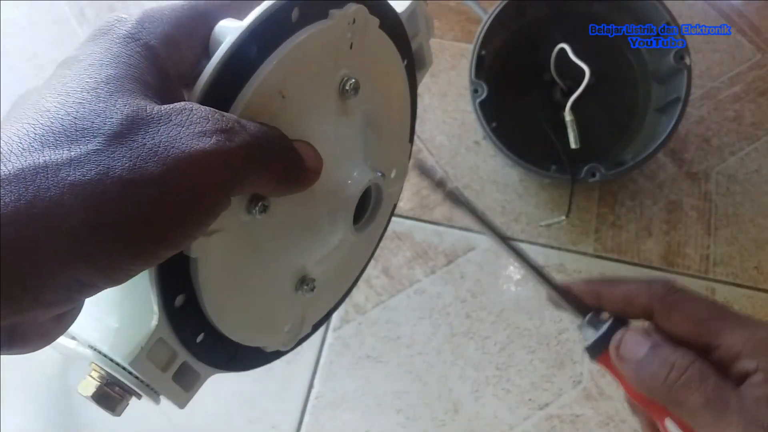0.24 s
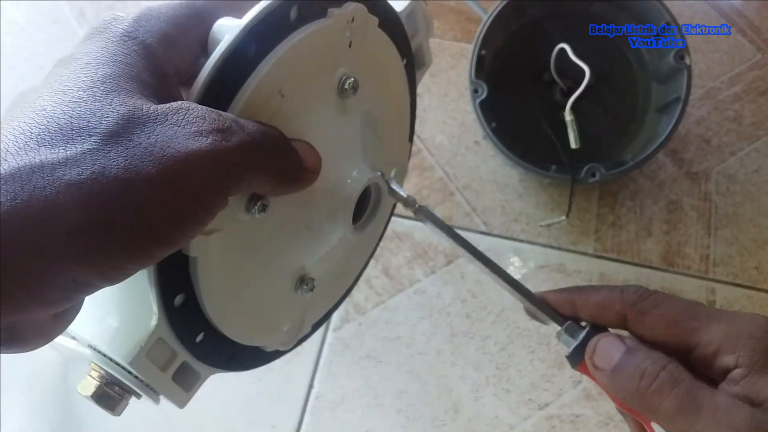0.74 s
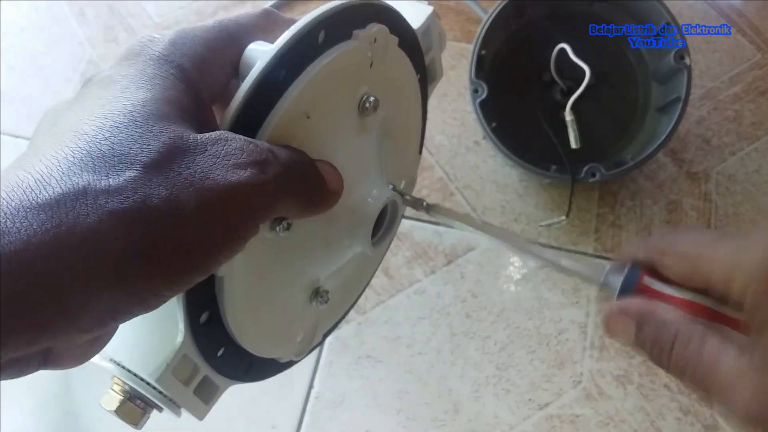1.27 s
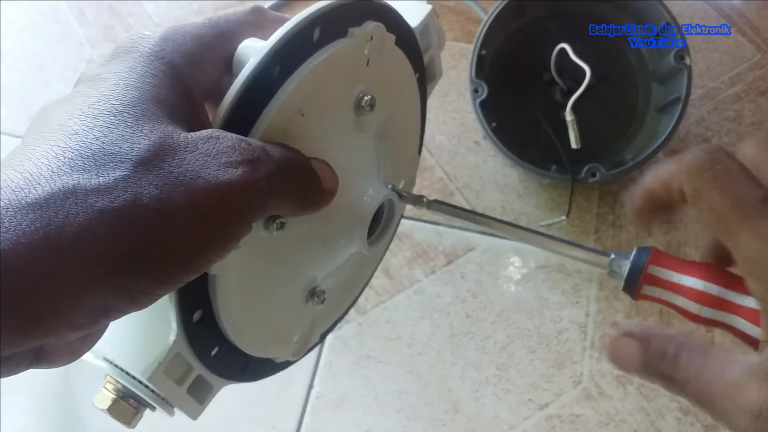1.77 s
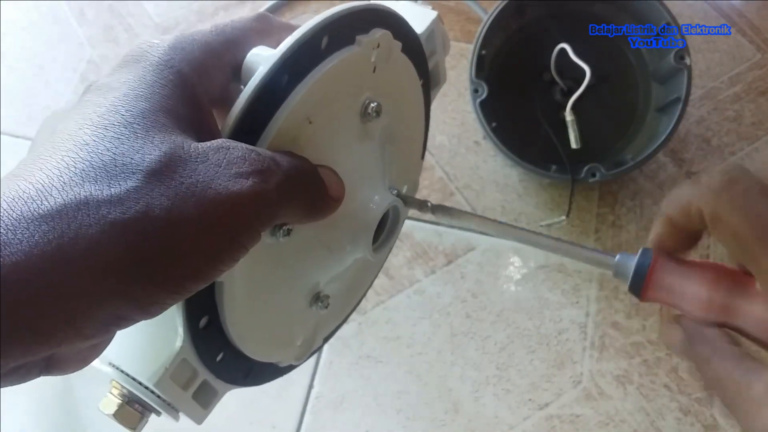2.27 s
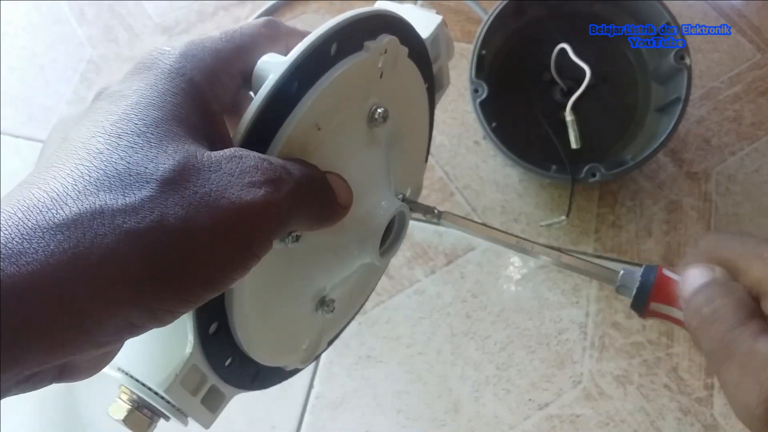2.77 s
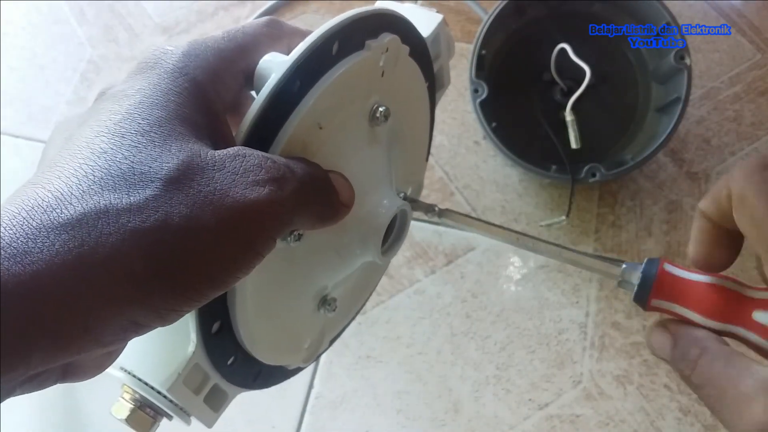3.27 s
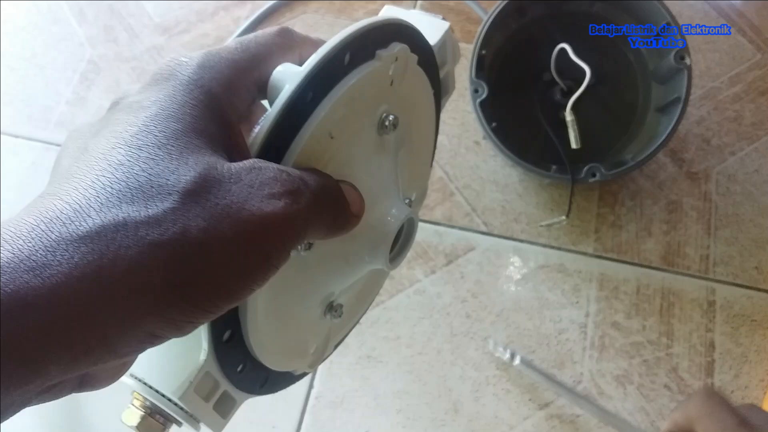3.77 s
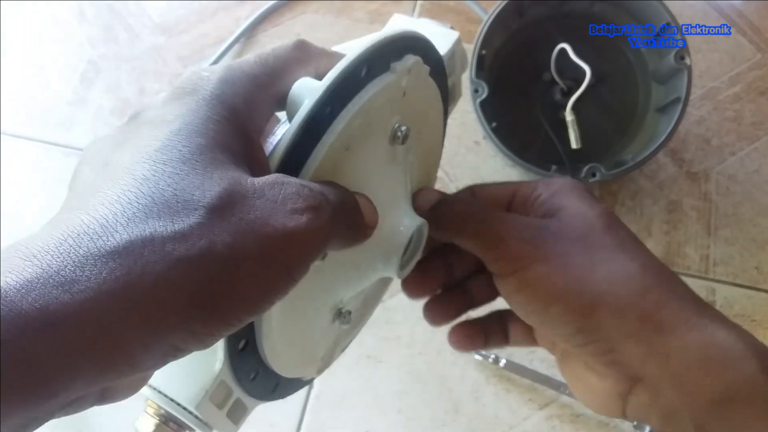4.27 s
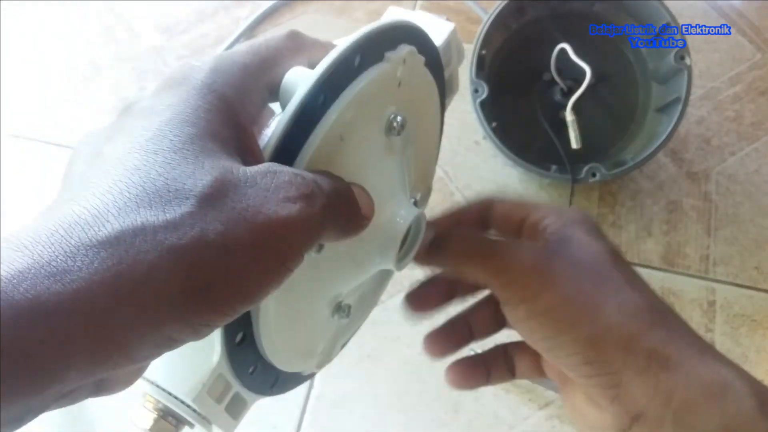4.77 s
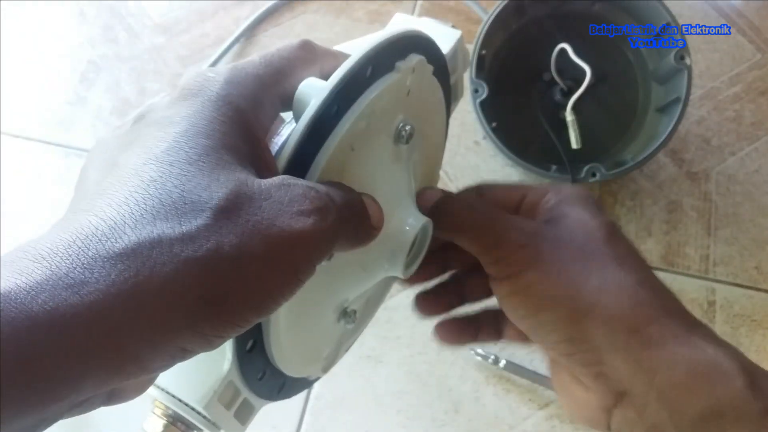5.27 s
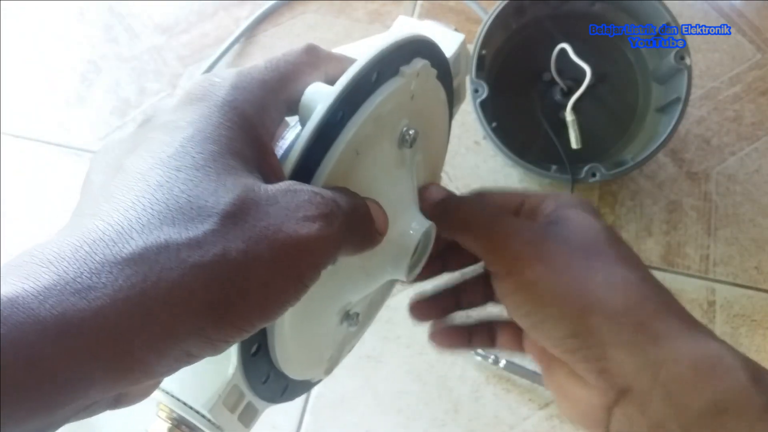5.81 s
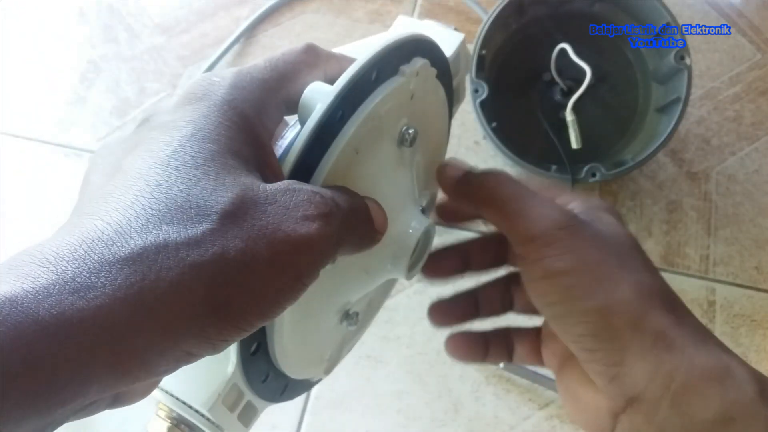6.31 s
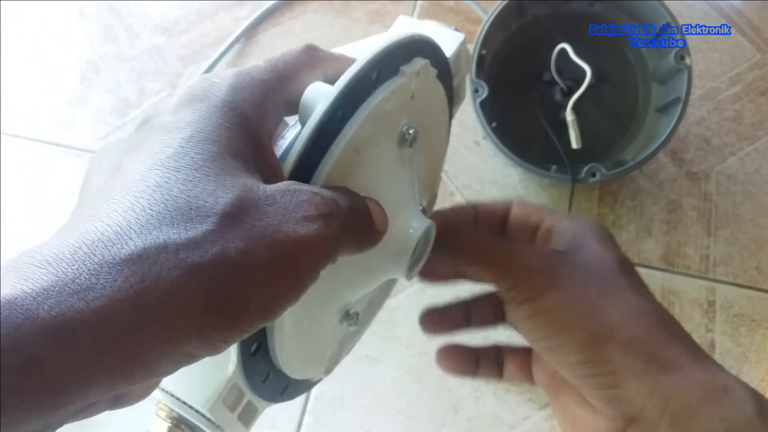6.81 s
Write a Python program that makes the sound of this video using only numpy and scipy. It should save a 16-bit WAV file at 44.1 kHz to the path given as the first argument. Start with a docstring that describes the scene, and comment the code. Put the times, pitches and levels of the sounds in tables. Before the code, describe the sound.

Low rumbling hum and faint electronic hiss underlie close, dry handling. First a cluster of crisp metal and plastic clicks with a soft deep bump, then barely audible even slips from unscrewing. A tool knocks and rocks to rest on floor tiles, followed by irregular small ticks of a loose screw in its hole. Short indoor tail, nearly mono.

```python
"""A screwdriver taps and slips about a screw in a plastic housing, is laid on the tiles, and fingers tick
the loose screw in its hole; a hum, hiss and thin whine lie underneath.
Each contact is a noisy click, damped sines of metal and plastic, and a bright snap if hard.
Slips are runs of tiny clicks, and a soft deep bump is a swelling sine; all handling but the bump
gets a short room tail. The background is coloured noise and steady sines."""
import sys
import numpy as np
from scipy import signal
from scipy.fft import rfft, irfft, next_fast_len
from scipy.io import wavfile

SR = 44100
rng = np.random.default_rng(int(sys.argv[2]) if len(sys.argv) > 2 else 0)


def dump(signal):
    """Clip the signal to [-1, 1] and save it as 16-bit WAV at the path in sys.argv[1]."""
    limited = np.clip(np.atleast_2d(signal).T, -1, 1)
    pcm = np.round(limited * 32767).astype(np.int16)
    wavfile.write(sys.argv[1], SR, pcm)


N = 310905
TIME = np.arange(N) / SR
AGE = TIME[:SR // 2]   # seconds since a contact

# A full grip chokes the metal's ring and drives the blow into the plastic.
GRIP_DAMPS_DB, GRIP_KNOCKS_DB = 23, 20.5

# Resonances of the plastic housing, knocked by tip and tool.
# Each row: frequency in Hz, relative level in dB, T60 decay in seconds.
HOUSING_MODES = [(230, -11.5, 0.067), (332, -5.5, 0.066), (420, 0, 0.042), (510, 2.5, 0.034),
                 (615, -0.5, 0.026), (816, -1.5, 0.017)]


def screwdriver_taps():
    """Tool tip and fingers knock on screw and housing, ringing the metal shaft and the plastic."""
    # Each row: start in seconds, strength in dB, grip from 0 to 1, contact hardness in Hz, favoured mode in Hz.
    taps = [(.554, -31, 0.21, 5600, 1525), (.7795, -31.5, 0.28, 7000, 2030),
            (.7905, -20.5, 0.13, 11100, 1940), (.834, -26.5, 0.45, 2920, 550), (.911, -31, 0.3, 2640, 2010),
            (1.0263, -29, .88, 2880, 2300), (4.1907, -21.5, .35, 2800, 2030)]
    # Resonances of the shaft. Each row: frequency in Hz, relative level in dB, T60 decay in seconds.
    shaft_modes = [(950, -10, .13), (1316, -12.5, 0.23), (1510, -10.5, 0.14), (1816, 5.5, 0.02),
                   (2025, -5.5, 0.094), (2692, -7, 0.21), (2880, -17, 0.19), (3324, -11.5, 0.17),
                   (4010, 4.5, 0.049), (4160, -9, .08)]
    # Colour of its dense, quickly damped click. Each row: frequency in Hz, relative density in dB per Hz.
    shaft_click = [(400, 3.5), (750, -23), (1150, 11), (1450, 2), (1880, 8.5), (2450, -2.5), (3200, 0),
                   (4000, 0), (4800, -3), (6000, -7), (8500, -12), (11000, -46)]
    hits = blows(taps, knock_db=-17.5, ring_db=-11, snap_hz=14900)
    return contacts(hits, shaft_modes, HOUSING_MODES, shaft_click, click_t60=0.019, snap_t60=0.01,
                    spread_db=1.5, rebound_s=.003, rebound_db=-9.0, rise_s=0.00095)


def screwdriver_drops():
    """The screwdriver drops on the tiles and rocks to rest, each contact weaker than the last."""
    # Each row: start in seconds, strength in dB, grip from 0 to 1, contact hardness in Hz, favoured mode in Hz.
    drops = [(3.8057, -20, 0.05, 9200, 2310), (3.8666, -25, 0.31, 6940, 3830),
             (3.8932, -28.5, 0.48, 7000, 3620), (3.9297, -32.5, 0.65, 5600, 3900),
             (3.9654, -35.5, .8, 1100, 1210), (3.9864, -42.5, 0.96, 1200, 1200),
             (4.0294, -49, 1, 1100, 1200)]
    # Resonances of the handle. Each row: frequency in Hz, relative level in dB, T60 decay in seconds.
    handle_modes = [(1196, 5, 0.018), (1428, -4, 0.027), (2450, 3.5, 0.022), (2520, -21, 0.16),
                    (3360, 2.5, 0.014), (6200, -4, 0.016)]
    # Colour of its dense, quickly damped click. Each row: frequency in Hz, relative density in dB per Hz.
    handle_click = [(400, -15), (750, -10), (1200, 3.5), (1800, -8), (2600, 1.5), (3600, -5.5), (4600, -2),
                    (6200, -4.5), (7500, -20), (11000, -24)]
    hits = blows(drops, knock_db=-25, ring_db=-6, snap_hz=11100)
    return contacts(hits, handle_modes, HOUSING_MODES, handle_click, click_t60=0.012, snap_t60=0.014,
                    spread_db=0.6, rebound_s=.0015, rebound_db=-6.0, rise_s=0.00078)


def screw_ticks():
    """The loose screw ticks in its hole: its metal rings and the plastic cover knocks."""
    # Resonances of the screw. Each row: frequency in Hz, relative level in dB, T60 decay in seconds.
    screw_modes = [(1100, -32, 0.064), (2014, -8, 0.14), (2072, -12, 0.11), (2303, -5.5, .1),
                   (2670, -17.5, 0.21), (3347, -17, 0.16), (3620, -11, 0.068), (4210, -11, 0.077),
                   (4350, 2.5, 0.028), (4690, -10.5, .07), (5420, -15.5, 0.14), (5630, -12, 0.033)]
    # Resonances of the cover. Each row: frequency in Hz, relative level in dB, T60 decay in seconds.
    cover_modes = [(474, -7, 0.023), (918, -2, .035), (1066, -1.5, 0.083), (1194, -2, 0.038),
                   (1320, 2, 0.013)]
    # Colour of the dense, quickly damped click. Each row: frequency in Hz, relative density in dB per Hz.
    screw_click = [(600, -37), (1100, 4), (1650, -17), (2200, -3.5), (2900, -5.5), (3550, 4), (4000, -1),
                   (4480, 10.5), (5000, 1), (5600, 3.5), (6600, -14), (10000, -26)]
    hits = blows(screw_touches(), knock_db=-26.5, ring_db=-11.5, snap_hz=21000)
    return contacts(hits, screw_modes, cover_modes, screw_click, click_t60=0.014, snap_t60=0.023,
                    spread_db=1.5, rebound_s=.0018, rebound_db=-5.0, rise_s=0.00091)


def screw_touches():
    """Flicks, a weaker fall back after each (weaker still in a firm grip), and random faint grazes."""
    # Fingers flick the loose screw against its hole.
    # Each row: start in seconds, strength in dB, grip from 0 to 1, contact hardness in Hz, favoured mode in Hz.
    flicks = [(.0797, -47.5, .4, 7500, 3670), (3.543, -36.5, 0.14, 2750, 2050),
              (4.1662, -29, .02, 7050, 1990), (4.31, -36.5, 0.06, 7500, 2010),
              (4.3323, -30, 0.38, 4900, 2310), (4.4115, -20.5, 0.1, 8000, 5710),
              (4.6305, -30, 0.07, 7500, 5570), (4.6894, -31, 0.46, 11000, 4660),
              (4.9507, -26, .05, 6600, 2320), (5.2697, -32, 0.2, 2960, 1940),
              (5.3709, -31, 0.68, 6000, 3600), (5.391, -30, 0.28, 2300, 2020),
              (5.445, -34, 0.91, 11000, 1350), (5.5548, -39, 0.18, 5500, 2020),
              (5.6104, -40.5, 0.08, 5500, 1960), (5.823, -37, 0.19, 3930, 2170),
              (6.2306, -29.5, 0.73, 7000, 4880), (6.423, -38, 0.03, 2200, 2020),
              (6.6739, -31.5, 0.26, 6000, 2020), (6.7049, -36, 0, 2700, 2300),
              (6.735, -31, 0.31, 9500, 2270), (6.8017, -43.5, .4, 7500, 4400),
              (6.97, -42.5, 0.86, 1500, 1080)]
    fall_delay_s, fall_loss_db = 0.053, 13
    falls = [(s + fall_delay_s, db - fall_loss_db - GRIP_DAMPS_DB * grip, grip, hard_hz, favoured_hz)
             for s, db, grip, hard_hz, favoured_hz in flicks]
    # one graze at a random moment in each time slot of the twiddling
    twiddle_start_s, twiddle_end_s, grazes_per_s = 5.85, 6.9, 5
    graze_db, graze_grip, graze_hardness_hz, graze_mode_hz = -41, 0.54, 3540, 2030
    slots = np.arange(twiddle_start_s, twiddle_end_s, 1 / grazes_per_s)
    times = np.minimum(slots + rng.random(len(slots)) / grazes_per_s, TIME[-1])
    grazes = [(s, graze_db, graze_grip, graze_hardness_hz, graze_mode_hz) for s in times]
    return [*flicks, *falls, *grazes]


def slips(catches_per_s, catch_t60):
    """Metal slips on metal and plastic in short runs of uneven catches, each a tiny click."""
    # Each row: start in seconds, strength in dB, fall time to 1/e in seconds, lowpass brightness in Hz.
    single_slips = [(1.242, -31.5, 0.033, 3500), (1.312, -33, 0.012, 2770), (1.435, -42, 0.0099, 1600),
                    (2.592, -37.5, 0.049, 1400), (2.942, -36.5, 0.05, 5500), (3.27, -39.5, 0.013, 3470),
                    (4.392, -37, 0.031, 5500), (4.658, -37.5, 0.037, 6000), (5.442, -32.5, 0.018, 5800),
                    (6.213, -37.5, 0.043, 6500)]
    # Colour of one catch. Each row: frequency in Hz, relative density in dB per Hz.
    slip_colour = [(300, -4), (540, 6.5), (750, -7), (1080, 5.5), (1650, -6), (2000, 4.5), (2350, -6.5),
                   (2900, -6.5), (4600, -8), (6000, -10.5), (8000, -4.5), (12000, -36)]
    out = np.zeros(N)
    for s, db, length_s, bright_hz in [*single_slips, *twists()]:
        happens = rng.random(len(AGE)) < catches_per_s / SR
        catches = happens * rng.standard_normal(len(AGE))
        catches[0] = 1
        catches = catches * np.exp(-(AGE / length_s) ** 2)
        run = signal.fftconvolve(catches / np.linalg.norm(catches), burst(slip_colour, catch_t60))
        add(out, s, from_db(db) * soften(run, bright_hz))
    return out


def twists():
    """The screw is undone in even twists of the wrist; the tip slips faintly in its head at each."""
    start_s, end_s, interval_s = 1.654, 3.0, .313
    db, length_s, bright_hz = -46.5, .022, 5050
    return [(s, db, length_s, bright_hz) for s in np.arange(start_s, end_s, interval_s)]


def hand_bump(s, hz, db, swell_s):
    """The held housing gives a soft, deep bump as the tool is pressed home: a sine that swells and dies."""
    out = np.zeros(N)
    envelope = AGE / swell_s * np.exp(1 - AGE / swell_s)
    add(out, s, from_db(db) * np.sin(2 * np.pi * hz * AGE) * envelope)
    return out


def blows(events, knock_db, ring_db, snap_hz):
    """Strength, grip and hardness decide how a blow divides into click, knock, ring and snap."""
    snap_db_per_octave = 23.5   # the snap grows with the hardness of the contact
    for s, db, grip, hard_hz, favoured_hz in events:
        grip = np.clip(grip, 0, 1)
        blow_knock_db = db + knock_db + GRIP_KNOCKS_DB * grip
        blow_ring_db = db + ring_db - GRIP_DAMPS_DB * grip
        blow_snap_db = db + snap_db_per_octave * np.log2(hard_hz / snap_hz)
        yield s, db, blow_knock_db, blow_ring_db, blow_snap_db, hard_hz, favoured_hz


def contacts(events, modes, body, colour, click_t60, snap_t60, spread_db, rebound_s, rebound_db, rise_s):
    """Contacts click, ring metal, knock plastic and snap more when hard; gives (impacts, rings)."""
    # Colour of the bright snap. Each row: frequency in Hz, relative density in dB per Hz.
    snap_colour = [(5000, -8), (9000, -14), (12500, -3.5), (14000, 4.5), (15500, 4.5), (17000, -28)]
    impacts, rings = np.zeros(N), np.zeros(N)
    onset = 1 - np.exp(-AGE / rise_s)
    for s, click_db, knock_db, ring_db, snap_db, hard_hz, favoured_hz in events:
        touches = chatter(rebound_s, rebound_db)
        click = signal.fftconvolve(burst(colour, click_t60), touches)[:len(AGE)]
        click = pick_out(from_db(click_db) * click, favoured_hz, boost_db=8.0, quality=11.5)
        knock = from_db(knock_db) * ring(body, spread_db)
        snap = from_db(snap_db) * 2 * burst(snap_colour, snap_t60)
        metal = from_db(ring_db) * ring(modes, spread_db, favoured_hz)
        add(impacts, s, onset * (soften(click, hard_hz) + knock + snap))
        add(rings, s, onset * soften(metal, hard_hz))
    return np.array([impacts, rings])


def chatter(rebound_s, rebound_db, count=3):
    """Parts touch, then rebound a few times within milliseconds, ever weaker."""
    touches = np.zeros(len(AGE))
    times = np.cumsum(rebound_s * rng.uniform(0.59, 1.5, count))
    touches[np.round(times * SR).astype(int)] = from_db(rebound_db * np.arange(1, count + 1))
    touches[0] = 1
    return touches / np.linalg.norm(touches)


def ring(modes, spread_db, favoured_hz=0):
    """Damped sines; where a blow lands decides how it shares its energy among them."""
    favour_db, favour_width_hz = 6.5, 260   # how strongly the point of contact lifts nearby modes
    out = 0
    for hz, db, t60 in modes:
        favour = favour_db * np.exp(-((hz - favoured_hz) / favour_width_hz) ** 2)
        strength = from_db(db + favour + spread_db * rng.standard_normal())
        polarity = rng.choice([-1, 1])
        out = out + polarity * strength * np.sin(2 * np.pi * hz * AGE) * fade(t60)
    return out


def burst(colour, t60):
    """Many close, heavily damped modes heard as one click, made from decaying coloured noise."""
    x = noise(colour, len(AGE)) * fade(t60)
    return x / np.sqrt(np.sum(x ** 2) / np.sum(fade(t60) ** 2)) / 2


def pick_out(x, hz, boost_db, quality):
    """The point of contact lifts the click around one resonance."""
    b, a = signal.iirpeak(hz, quality, fs=SR)
    return x + (from_db(boost_db) - 1) * signal.lfilter(b, a, x)


def soften(x, hz):
    """A softer contact holds less treble: a lowpass."""
    return signal.sosfilt(signal.butter(N=3, Wn=min(hz, SR / 2 - 1), fs=SR, output="sos"), x)


def fade(t60):
    """Exponential decay after a contact, down 60 dB at t60 seconds."""
    return np.exp(-np.log(1000) * AGE / t60)


def room(x, build_s, absorb_t60):
    """Reflections from floor and walls thicken quickly into a short tail that favours no single pitch."""
    # Colour of the reflections. Each row: frequency in Hz, relative level in dB.
    room_colour = [(100, -9), (450, 2), (1300, 4), (3000, 4), (6000, -0.5), (14000, 0)]
    echo_t60, room_db = 0.44, -5.5   # decay in seconds before the absorption below; tail level in dB
    echoes = rng.standard_normal(len(AGE)) * fade(echo_t60) * (1 - np.exp(-AGE / build_s))
    bins = rfft(echoes, 2 * len(AGE))
    # keep only the phases, so that the colour alone sets the spectrum
    tail = coloured(bins / np.abs(bins), room_colour, 2 * len(AGE))[:len(AGE)]
    tail = tail * fade(absorb_t60)   # no room resonance lingers
    return from_db(room_db) * signal.fftconvolve(x, tail / np.linalg.norm(tail))[:N]


def background():
    """A low, rumbling hum of drifting level, with the steady hiss and thin whine of electronics."""
    # Colour of the hum. Each row: frequency in Hz, relative density in dB per Hz.
    hum_colour = [(25, -43), (40, -23), (60, -12), (85, 0.5), (110, 0.5), (133, -0.5), (146, -6),
                  (189, -3.5), (220, -13.5), (284, -13), (315, -19.5), (480, -26), (650, -36), (1500, -58)]
    # Level of the hum. Each row: time in seconds, level in dB rms.
    hum_level = [(0.1, -49.5), (0.85, -47.5), (1.26, -50), (2.34, -46.5), (6.2, -49), (6.49, -50.5),
                 (6.8, -44), (6.91, -49), (7.05, -49)]
    # Colour of the hiss. Each row: frequency in Hz, relative density in dB per Hz.
    hiss_colour = [(300, -17), (700, 1.5), (1500, -3), (3000, -8), (6000, -11.5), (10000, -13.5),
                   (14300, -12), (15000, -3), (15800, -5), (16500, -18.5)]
    # Steady whine tones. Each row: frequency in Hz, level in dB rms.
    whine_tones = [(11176, -82.5), (15079, -69.5)]
    hiss_db = -67   # rms
    hum = from_db(np.interp(TIME, *np.transpose(hum_level))) * noise(hum_colour, N)
    hiss = from_db(hiss_db) * noise(hiss_colour, N)
    whine = sum(from_db(db) * np.sqrt(2) * np.sin(2 * np.pi * hz * TIME) for hz, db in whine_tones)
    return hum + hiss + whine


def side_noise():
    """A faint noise of opposite sign in the two channels."""
    # Colour of this noise. Each row: frequency in Hz, relative density in dB per Hz.
    side_colour = [(59, -63), (100, -35), (248, -32), (326, -12), (497, 0.5), (1160, -4), (1760, -6.5),
                   (5630, 3), (14500, 1.5), (15500, -10)]
    side_db = -74   # rms in each channel
    return from_db(side_db) * noise(side_colour, N) * np.array([[1], [-1]])


def noise(spectrum, size):
    """Coloured noise of rms 1."""
    padded = next_fast_len(size)
    return coloured(rfft(rng.standard_normal(padded)), spectrum, padded)[:size]


def coloured(bins, spectrum, size):
    """Turn spectral bins into a sound of rms 1 with the given (Hz, dB) colour."""
    hz, db = np.transpose(spectrum)
    bin_hz = np.maximum(np.fft.rfftfreq(size, 1 / SR), 1)
    gain_db = np.interp(np.log(bin_hz), np.log(hz), db)
    x = irfft(bins * from_db(gain_db), size)
    return x / np.std(x)


def from_db(db):
    """Decibels to amplitude."""
    return 10 ** (np.asarray(db) / 20)


def add(track, s, sound):
    """Mix a sound in at a given time in seconds."""
    start = max(round(s * SR), 0)
    track[start:start + len(sound)] += sound[:N - start]


def scene():
    """Handling, its room tail and the background sit in the centre; only a faint noise differs by channel."""
    impacts, rings = screwdriver_taps() + screwdriver_drops() + screw_ticks()
    impacts = impacts + slips(catches_per_s=670, catch_t60=0.017)
    # broad plastic surfaces spread the impacts through the room; small ringing parts send less into it
    echo = room(impacts + from_db(-5.0) * rings, build_s=0.0031, absorb_t60=0.36)
    bump = hand_bump(s=.875, hz=52.3, db=-48, swell_s=0.016)
    mono = impacts + rings + echo + bump + background()
    return mono + side_noise()


def record(dry):
    """The top is cut steeply by an elliptic lowpass."""
    cutoff_hz = 15900
    return signal.sosfilt(signal.ellip(10, .1, 80, cutoff_hz, fs=SR, output="sos"), dry)


dry = scene()
out = record(dry)
dump(out)
```